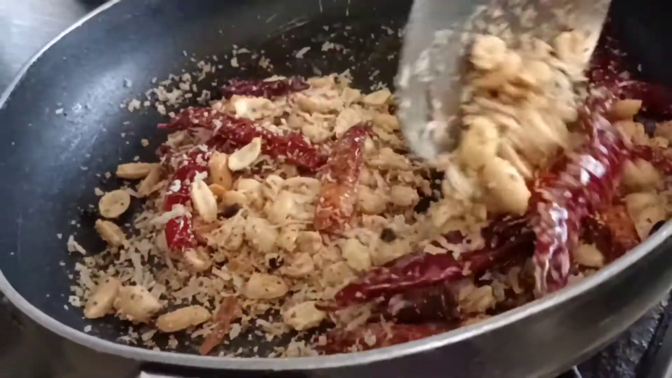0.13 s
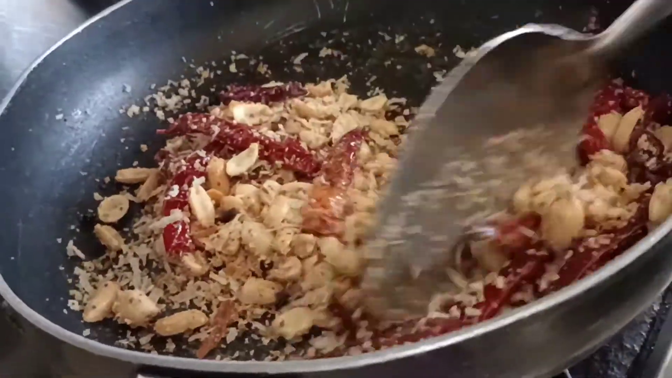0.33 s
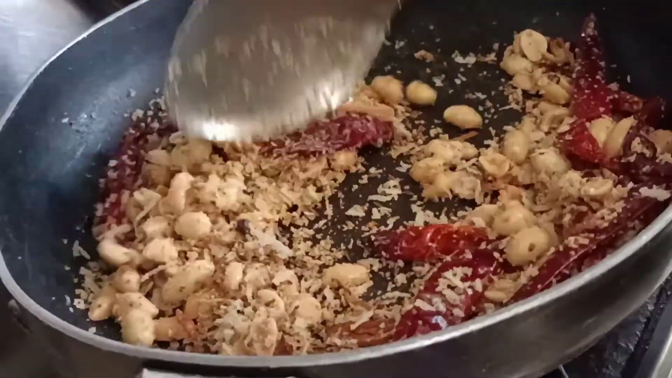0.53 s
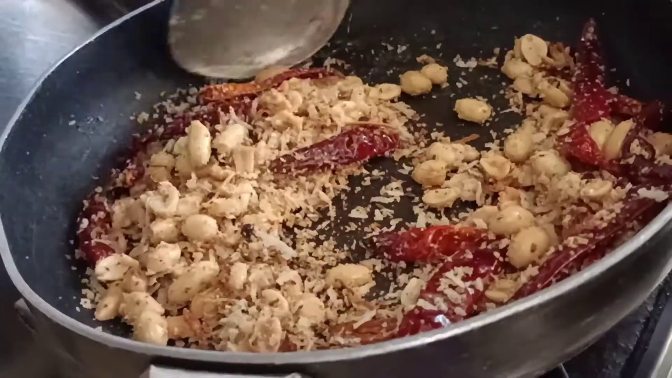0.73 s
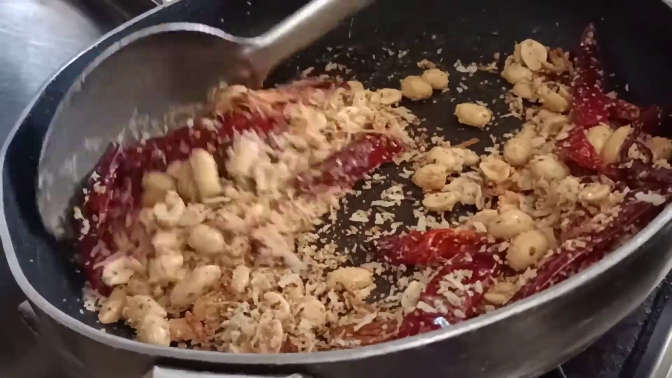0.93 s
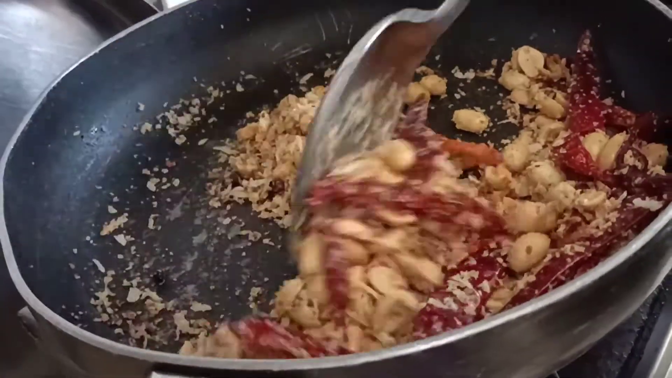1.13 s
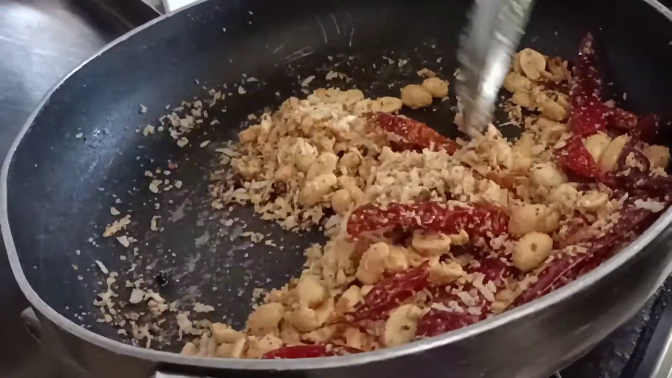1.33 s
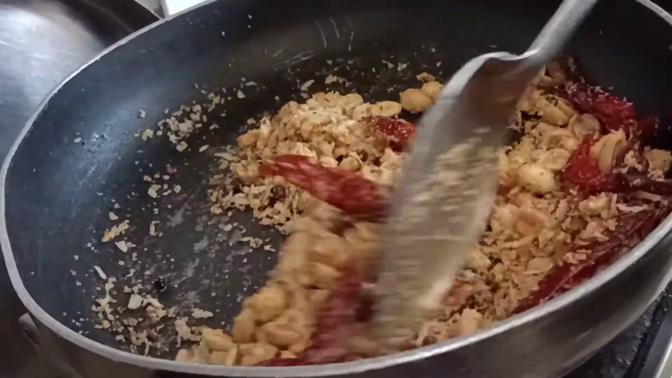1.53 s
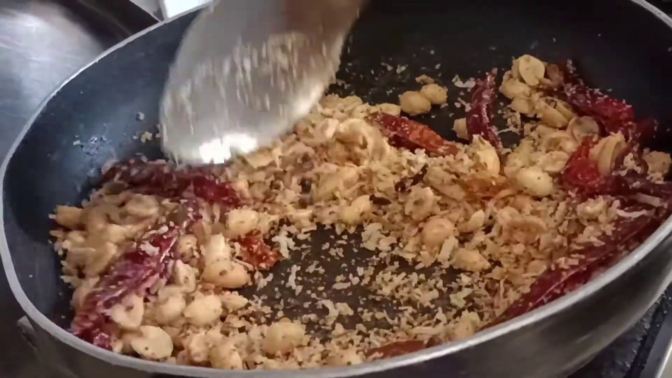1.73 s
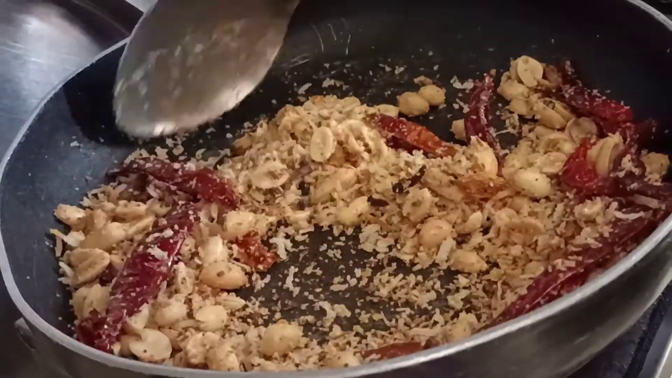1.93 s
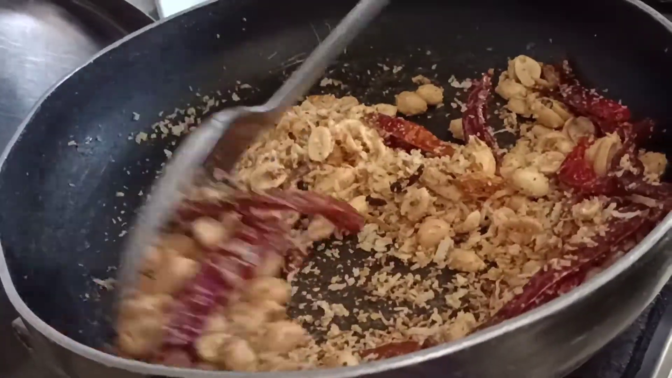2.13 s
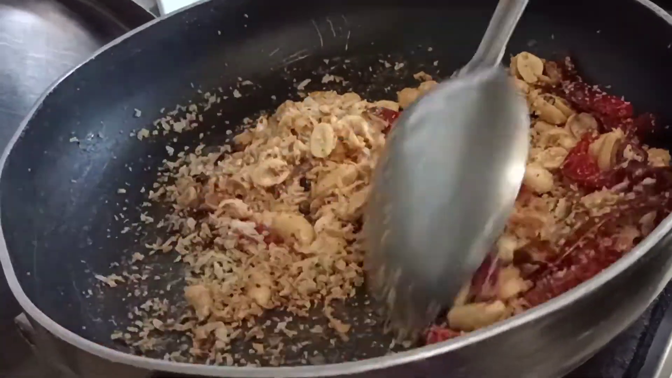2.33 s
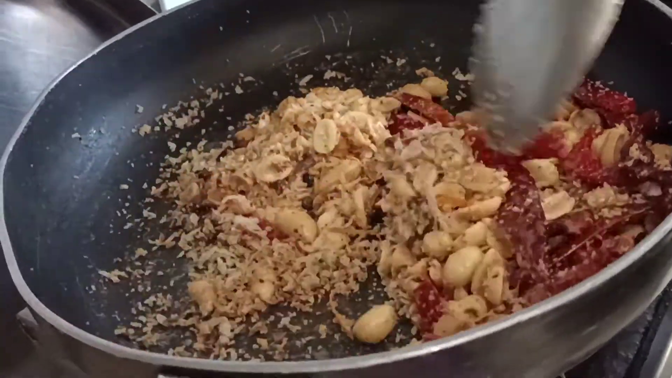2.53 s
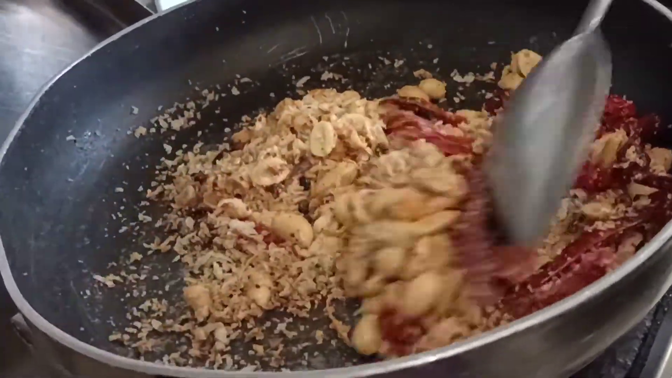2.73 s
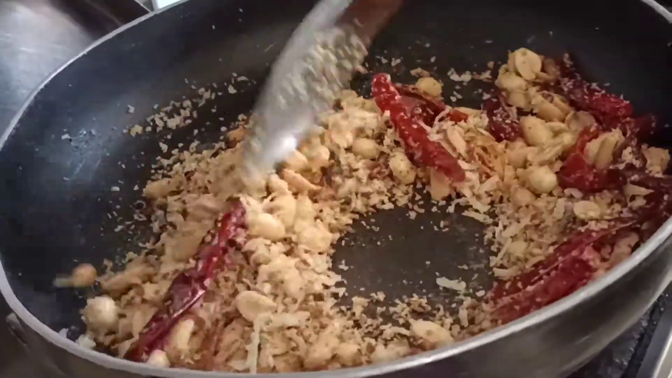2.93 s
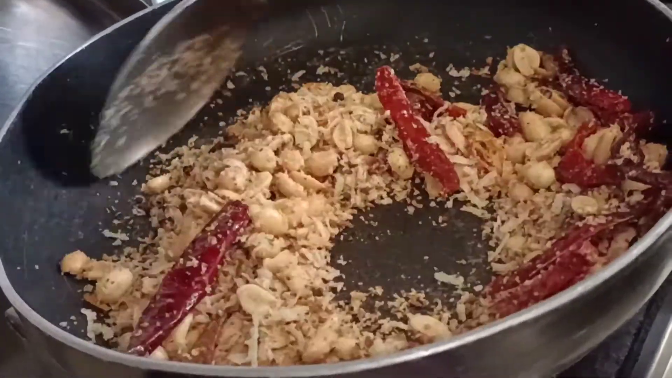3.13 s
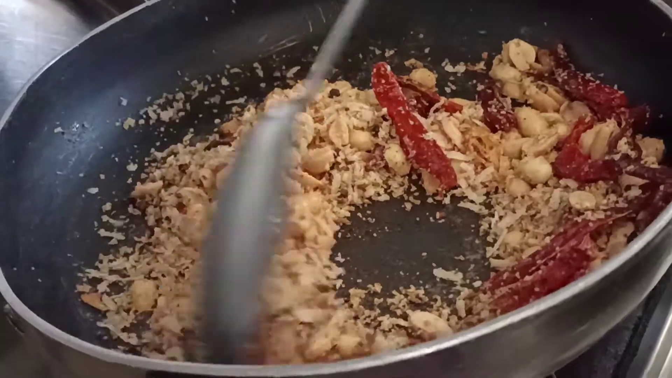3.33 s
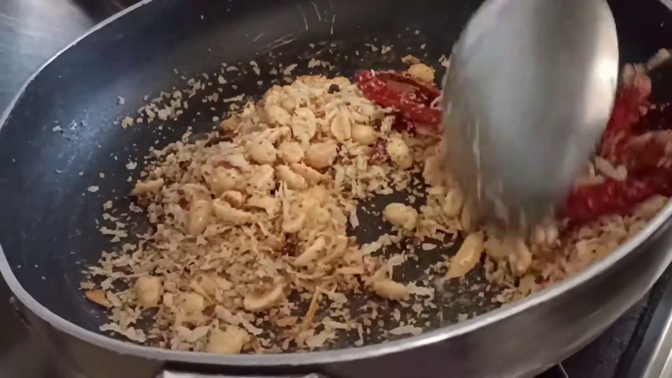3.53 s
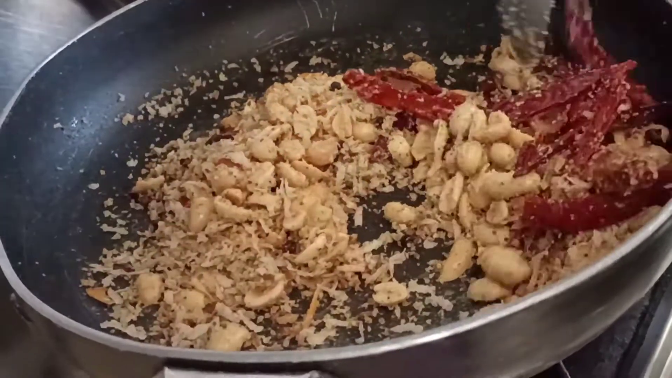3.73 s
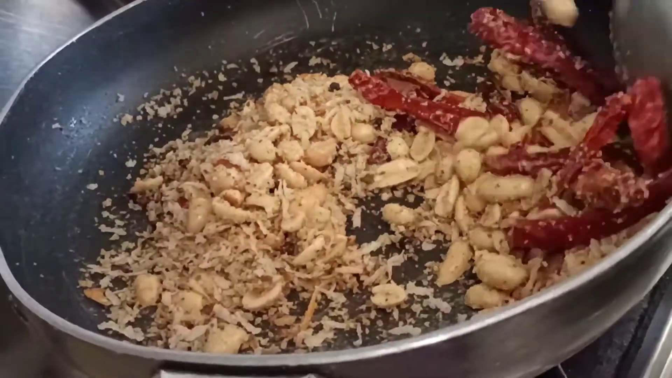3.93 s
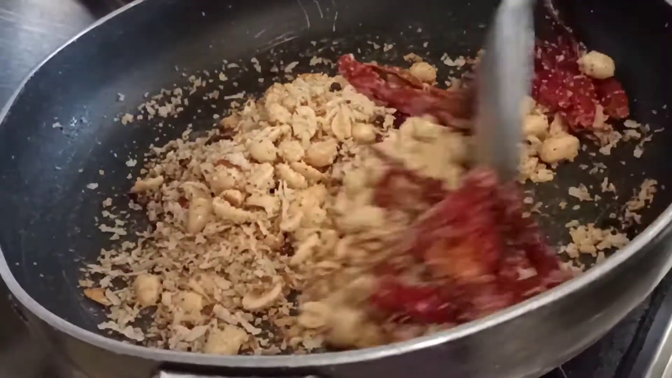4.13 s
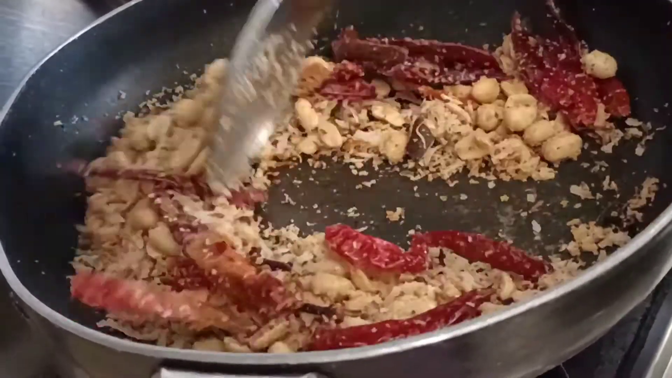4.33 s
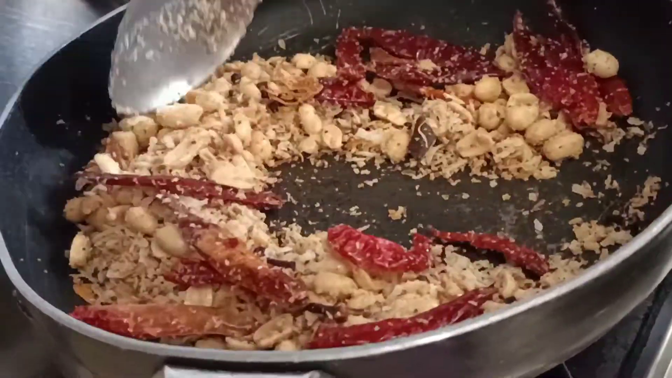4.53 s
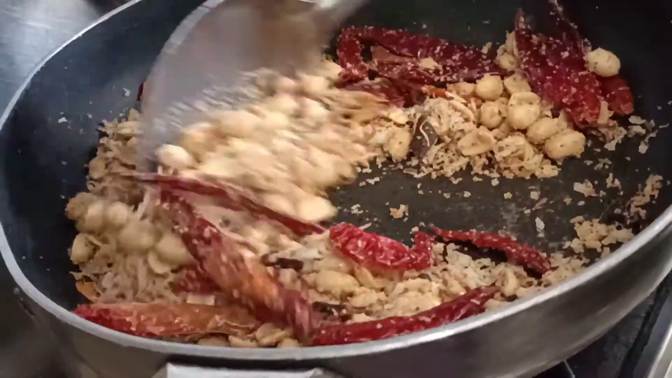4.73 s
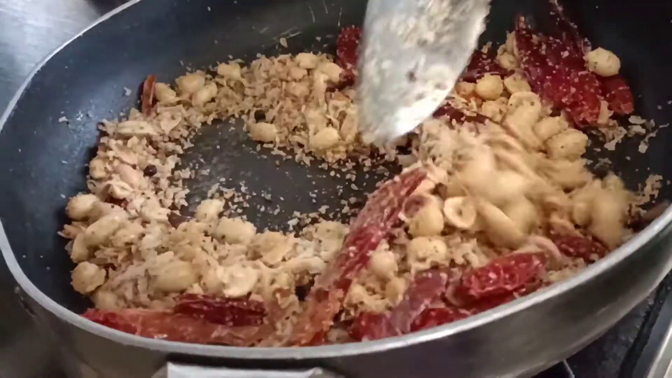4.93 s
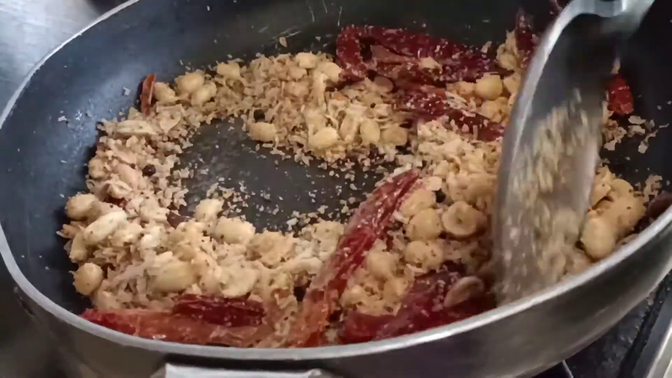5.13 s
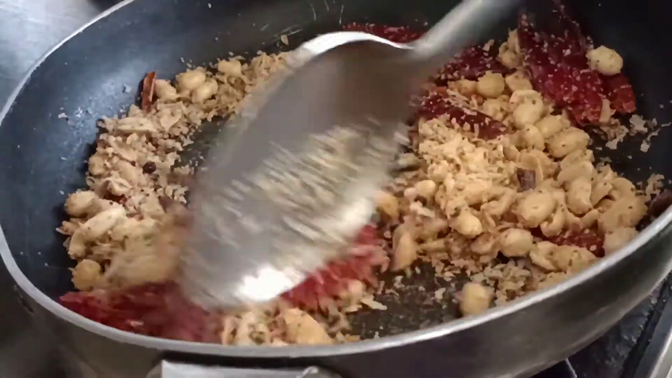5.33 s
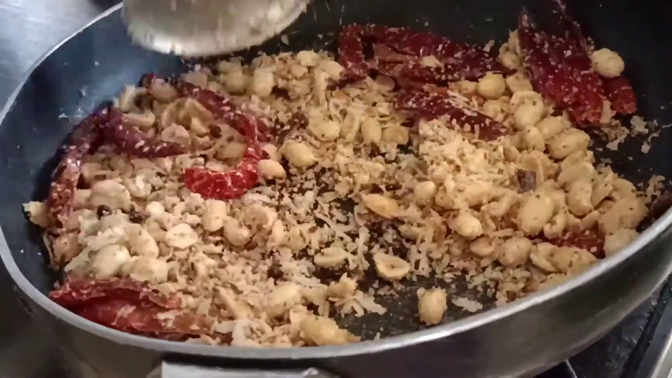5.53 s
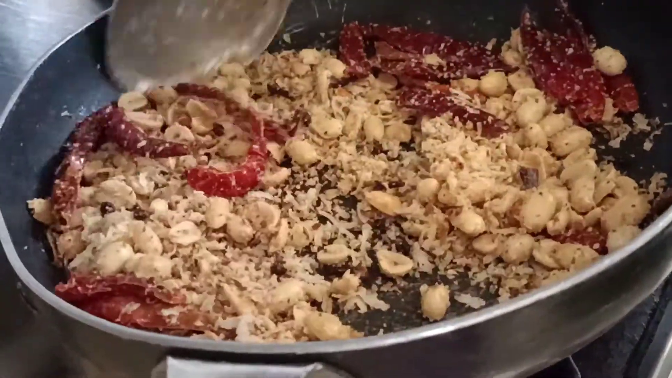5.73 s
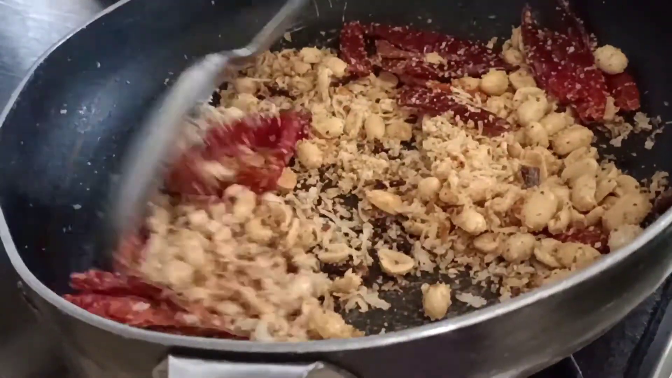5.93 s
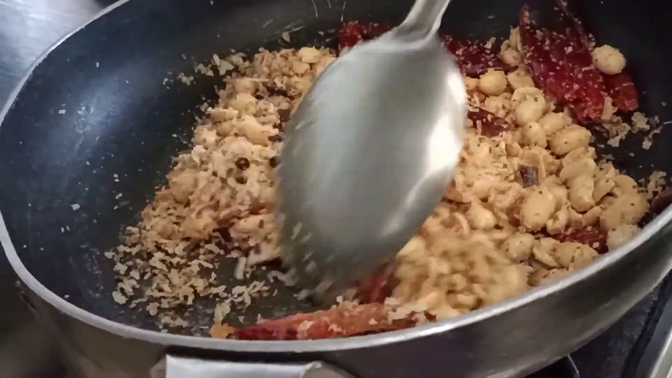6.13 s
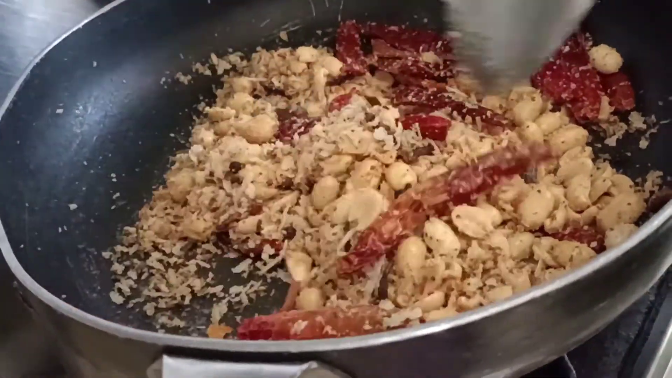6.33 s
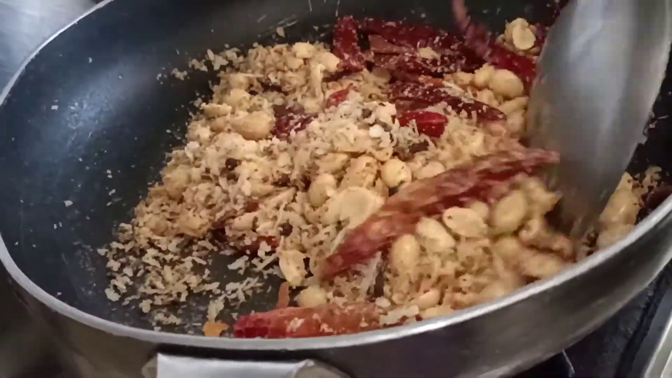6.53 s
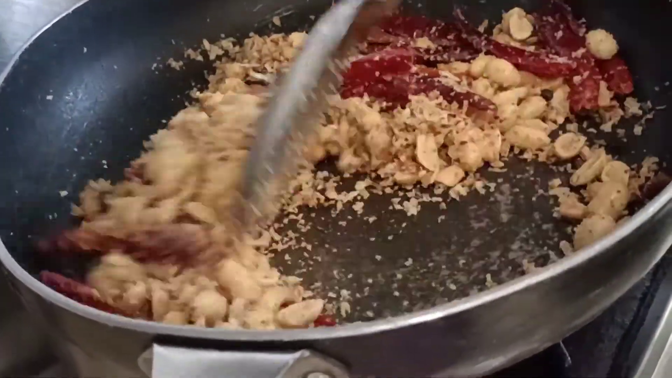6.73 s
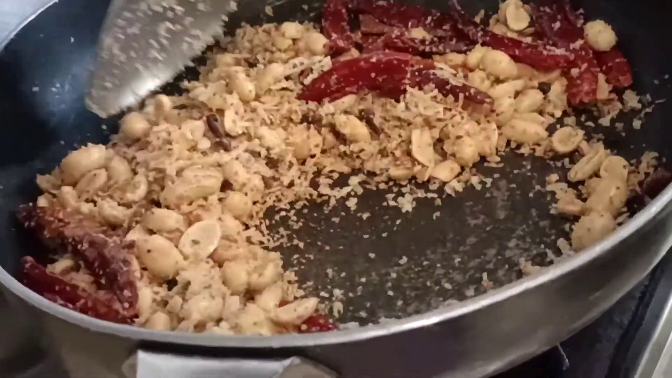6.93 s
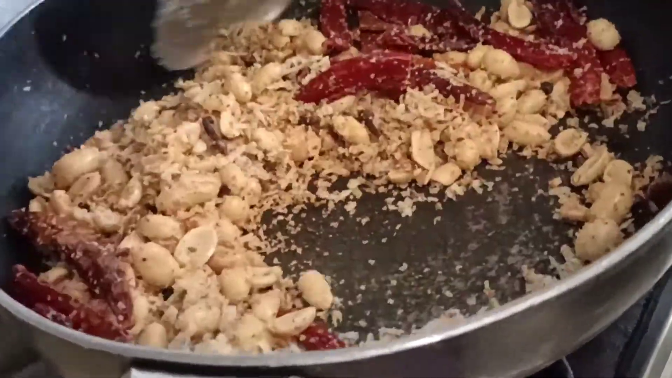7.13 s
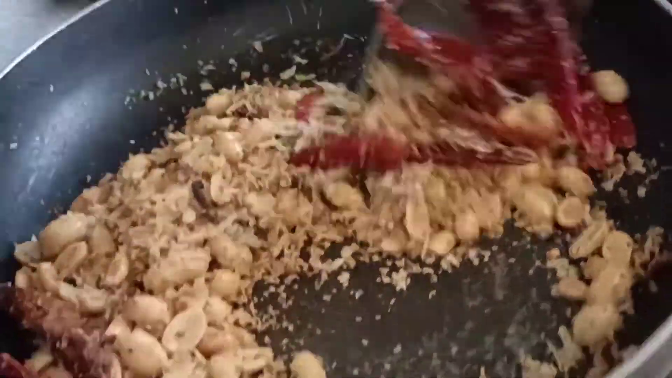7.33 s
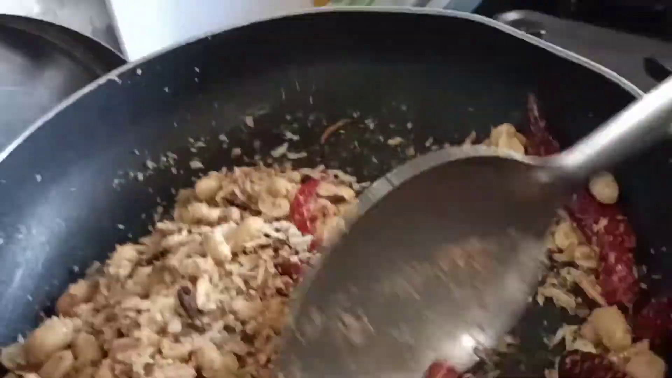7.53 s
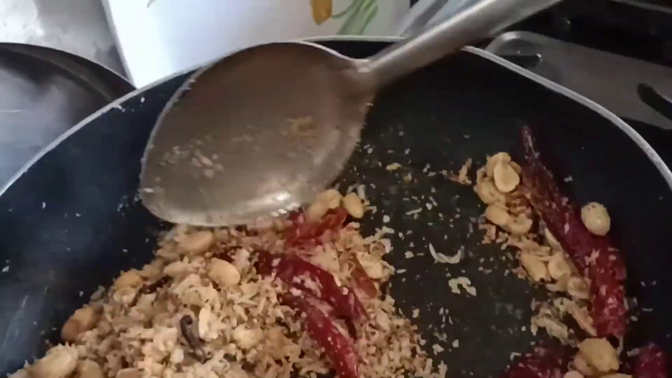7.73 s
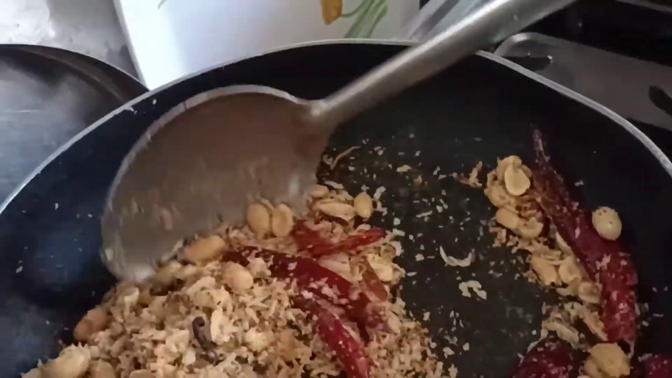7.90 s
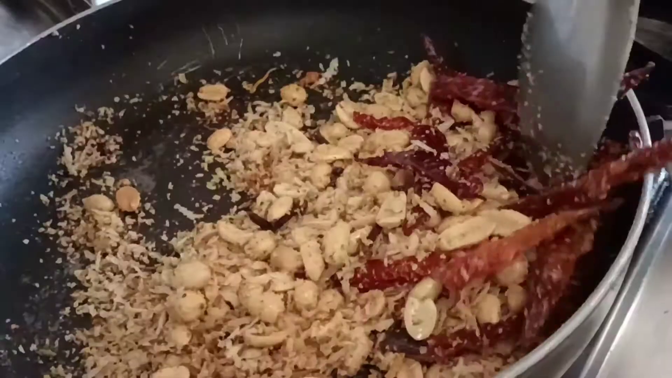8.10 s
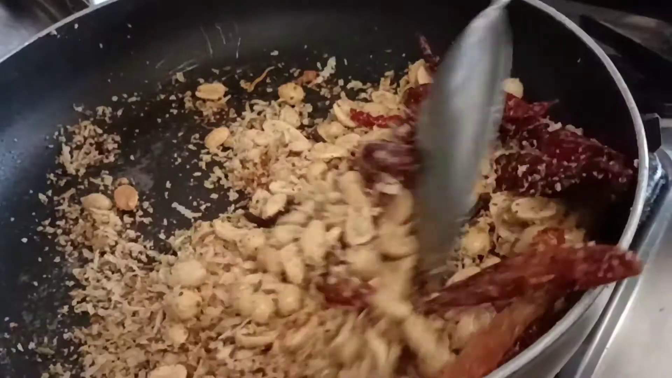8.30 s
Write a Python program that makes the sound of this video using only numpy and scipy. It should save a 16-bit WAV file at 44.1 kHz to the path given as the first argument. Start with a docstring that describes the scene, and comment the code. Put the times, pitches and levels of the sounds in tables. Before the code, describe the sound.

A metal spoon scrapes and clangs around a pan in uneven strokes, pushing dry, rustling coconut flakes, peanuts and brittle chillies, heard close up.

```python
"""In a small kitchen, a steel spoon stirs dry coconut, peanuts and chillies round a nonstick pan, heard close up.
Strokes land with knocks and clangs from struck resonances; the edge scrapes and squeaks as it slips over the coating.
Uneven clicks make the pan judder on its stand and the pushed food rustle; single nuts tick against the wall.
Tapped spoon and touched wall ring on, a soft rumble follows the food, and the room adds a short tail and faint noise."""
import sys
import numpy as np
from scipy import signal
from scipy.fft import rfft, irfft
from scipy.io import wavfile
from scipy.ndimage import map_coordinates

SR = 44100
rng = np.random.default_rng(int(sys.argv[2]) if len(sys.argv) > 2 else 0)


def dump(signal):
    """Clip the signal to [-1, 1] and save it as 16-bit WAV at the path in sys.argv[1]."""
    limited = np.clip(np.atleast_2d(signal).T, -1, 1)
    pcm = np.round(limited * 32767).astype(np.int16)
    wavfile.write(sys.argv[1], SR, pcm)


N = 368889
T = np.arange(N) / SR  # time [s]

# Levels in the tables are relative: most sounds get a make-up gain in their own function.
# the spoon sweeps through the food: (start [s], rise [s], hold [s], fade [s],
# scrape of the edge [dB], rustle of the food [dB], judder of the pan [dB])
SWEEPS = [ (0.0, 0.00054, 0.0069, 0.97, -58, -55.5, -34), (0.089, 0.039, 0.037, 0.12, -25, -38.5, -31),
          (0.205, 0.022, 0.062, 0.13, -24.5, -48, -58), (0.394, 0.029, 0.15, 0.075, -67, -65, -71),
          (0.581, 0.092, 0.027, 0.52, -47.5, -54, -68), (0.738, 0.029, 0.05, 0.23, -37.5, -48.5, -33.5),
          (1.182, 0.085, 0.015, 0.12, -38.5, -44, -46), (1.323, 0.0018, 0.038, 0.29, -30.5, -44, -36),
          (1.848, 0.011, 0.12, 0.15, -52, -54, -52), (1.923, 0.043, 0.18, 0.085, -42.5, -52, -50.5),
          (2.319, 0.057, 0.018, 0.36, -44, -69, -43.5), (2.443, 0.04, 0.12, 0.39, -38.5, -40.5, -39),
          (2.654, 0.033, 0.086, 0.87, -40.5, -59.5, -43.5), (2.997, 0.042, 0.13, .25, -45, -59, -45),
          (3.136, 0.054, 0.0051, 0.15, -34.5, -47, -39), (3.216, 0.068, 0.044, 0.24, -44, -62, -43.5),
          (3.527, 0.0021, 0.019, 0.16, -23.5, -59, -35), (3.623, 0.098, 0.016, 0.23, -31, -35.5, -45),
          (3.758, 0.026, 0.072, 0.34, -36.5, -50, -35.5), (4.128, 0.0044, 0.012, 0.18, -76, -63.5, -66),
          (4.232, 0.063, 0.0059, 0.3, -69, -50.5, -53.5), (4.387, 0.17, 0.021, 0.26, -42.5, -50, -44),
          (4.555, 0.11, 0.065, 0.34, -44, -52.5, -62), (5.1, 0.052, 0.013, 0.16, -24, -40.5, -32),
          (5.233, 0.058, 0.12, 0.031, -51.5, -60, -52.5), (5.531, 0.011, 0.032, 0.16, -50, -52, -67),
          (5.63, 0.056, 0.11, 0.11, -41.5, -52.5, -49), (5.836, 0.034, 0.026, 0.033, -43, -55, -54),
          (6.092, 0.00047, 0.0024, 0.11, -60.5, -49, -41), (6.162, 0.0056, 0.02, 0.092, -58, -46.5, -31),
          (6.186, 0.022, 0.066, 0.2, -42, -37.5, -36), (6.35, 0.035, 0.017, 0.68, -43.5, -56.5, -66),
          (6.855, 0.031, 0.016, 0.93, -40.5, -59, -39.5), (6.992, 0.002, 0.045, 0.17, -22, -41, -36.5),
          (7.483, 0.0062, 0.014, 0.23, -41, -49.5, -30.5), (7.532, 0.099, 0.059, 0.092, -45.5, -52, -34),
          (7.653, 0.027, 0.045, 0.16, -25.5, -34.5, -48), (7.745, 0.002, 0.075, 0.17, -23, -37, -35.5),
          (7.938, 0.039, 0.041, 0.3, -44.5, -56.5, -48), (8.084, 0.0098, 0.054, 0.13, -44, -47.5, -72),
          (8.223, 0.008, 0.019, 0.2, -45, -53, -46.5), (8.305, 0.0025, 0.064, 0.45, -23.5, -60, -26.5), ]
# the spoon leans on the pan and shoves it along its stand: (start [s], hold [s], level [dB])
SHOVES = [(0.004, 0.039, -40), (1.146, 0.094, -28), (2.395, 0.028, -23.5), (3.527, 0.091, -26.5),
          (4.988, 0.021, -41.5), (5.581, 0.075, -42), (6.336, 0.078, -35.5), (6.881, 0.057, -34.5),
          (7.478, 0.04, -24.5), (8.141, 0.25, -42), (8.293, 0.042, -32)]
# the spoon strikes the pan: (time [s], clang [dB], thud [dB], bright crack of the steel edge [dB],
# dull knock through the food [dB])
BLOWS = [(0.094, -27, -25, -44, -35), (0.121, -26, -27, -26, -43), (0.139, -18, -24, -34, -43),
         (0.173, -6, -21, -36.5, -45), (0.335, -16, -57, -40, -37), (1.1487, -20, -26, -63, -34.5),
         (1.321, -16, -23, -54, -51.5), (1.369, -15, -28, -50, -30.5), (2.3935, -18, -10.5, -60, -22.5),
         (2.4003, -32, -32, -60, -20), (2.413, -35, -32, -60, -20), (3.1747, -15, -32, -42, -41),
         (3.5241, 0, -21, -35, -18), (3.545, -23, -33, -44, -21), (3.8948, -16, -43, -45, -41),
         (5.1063, -23, -20.5, -35, -25.5), (5.126, -8, -11.5, -36, -35), (5.143, -11, -34, -45.5, -24),
         (5.156, -11.5, -28, -35, -36), (6.1667, -42, -28, -54, -41), (6.219, -36, -31.5, -52, -27.5),
         (6.8753, -18, -44, -35.5, -51), (6.89, -28.5, -37, -61, -33), (6.9945, -1.5, -34, -19, -30),
         (7.01, -5.5, -44, -28, -38), (7.097, -14.5, -51.5, -55, -42), (7.479, -20, -24, -58, -27.5),
         (7.6503, -15, -18.5, -50, -24), (7.6867, -18, -50, -43, -34), (7.7399, -0.5, -32, -35, -36),
         (7.768, -6, -38, -45, -32), (8.3064, -3, -18, -42, -22)]
# the bowl of the spoon is pressed through the heap: (middle [s], length [s], level [dB])
GRINDS = [(0.259, 0.23, -40), (2.554, 0.13, -27), (2.64, 0.15, -37), (3.731, 0.18, -28), (3.82, 0.11, -32),
          (4.681, 0.15, -48.5), (6.306, 0.26, -37)]
# the edge sticks and squeaks: (start [s], length [s], start pitch [Hz], end pitch [Hz], level [dB])
SQUEAKS = [(0.148, 0.039, 2865, 2837, -21.5), (0.208, 0.053, 1933, 1920, -28.5),
           (0.212, 0.097, 680, 686, -34), (0.27, 0.075, 3280, 3300, -42), (1.32, 0.01, 2880, 2830, -24.5),
           (1.323, 0.057, 2490, 2470, -34.5), (2.49, 0.038, 2760, 2844, -39),
           (2.572, 0.038, 1950, 1916, -32), (2.64, 0.018, 2190, 3320, -31), (6.166, 0.017, 2850, 2890, -42),
           (6.198, 0.021, 2680, 2354, -27.5), (6.25, 0.057, 2820, 2780, -38),
           (6.85, 0.017, 2530, 2620, -38.5), (7.678, 0.039, 1912, 1680, -20.5),
           (7.7377, 0.008, 4100, 4100, -13.5), (7.797, 0.037, 4080, 4020, -38),
           (8.099, 0.029, 2516, 2490, -38.5)]
# nuts and chillies hit the wall: (time [s], peak level [dB], pitch [Hz])
TICKS = [(0.4541, -37, 2200), (0.6728, -25.5, 2470), (1.4586, -23.5, 2650), (1.5448, -32, 2870),
         (1.589, -27.5, 2160), (2.145, -36, 2360), (2.9183, -38, 2550), (3.8932, -21.5, 2040),
         (4.2424, -32.5, 2400), (5.345, -27, 2240), (5.3926, -37.5, 2770), (5.5347, -36.5, 3610),
         (5.543, -28, 2390), (5.6496, -28.5, 2260), (5.8523, -34.5, 2000), (6.094, -46.5, 4140),
         (6.96, -28.5, 1650), (7.986, -28, 2790), (8.077, -28, 2270), (8.1, -26.5, 2430),
         (8.2428, -31, 3020)]
# a touch leaves one mode of the pan wall singing until the spoon damps it:
# (start [s], damped from [s], pitch [Hz], level [dB], t60 [s])
WALL_RINGS = [(2.396, 2.392, 715, -16.5, .14), (3.183, 3.19, 693, -23.5, 0.22),
              (3.523, 3.56, 1924, -20, .2), (3.525, 3.55, 3290, -18, .16), (5.194, 5.236, 682, -23.5, 0.23),
              (5.655, 5.788, 664, -40.5, 1.9), (5.650, 5.75, 1123, -44.5, .55),
              (6.1, 6.183, 1130, -47, 1.2), (7.48, 7.54, 691, -19, 0.14), (7.788, 7.785, 684, -24, 0.44),
              (8.304, 8.36, 1380, -18, 0.17), (8.305, 8.36, 1870, -12, 0.18), (8.3, 8.36, 1940, -21, 0.27)]
# the lifted spoon is tapped and rings by itself: (time [s], level [dB])
SPOON_TAPS = [(4.959, -46), (4.991, -36.5), (8.098, -39)]

# resonances of the pan with the spoon in it: (pitch [Hz], width [Hz], level [dB])
PAN_MODES = [(192, 18, -6), (311, 15, -3), (668, 16, 2), (722, 20, -1), (817, 20, -4), (1030, 30, -3),
             (1125, 24, -4), (1197, 16, 1), (1275, 30, 1), (1390, 26, 1), (1686, 20, -4), (1820, 30, -4),
             (1879, 18, 3), (1945, 38, 2), (2024, 28, 0), (2300, 50, -9), (2481, 30, -1), (2720, 40, -6),
             (2839, 26, 0), (2895, 40, 0), (3285, 34, 2), (3985, 50, -2), (4070, 70, -5), (4300, 60, -12),
             (4720, 50, -13), (5190, 50, -9), (5720, 45, -16)]
# resonances of the pan floor padded by food: (pitch [Hz], width [Hz], level [dB])
KNOCK_MODES = [(195, 50, -3), (440, 70, -3), (570, 70, -4), (690, 48, 1.5), (800, 70, -1), (950, 80, -4),
               (1100, 80, -2), (1340, 70, -4), (1950, 110, -14), (2900, 170, -10)]
# resonances of the pan rocking on its stand: (pitch [Hz], width [Hz], level [dB])
STAND_MODES = [(92, 25, -15), (165, 25, -6), (191, 20, 2), (255, 30, -4.5), (312, 16, 4.5), (392, 16, -3),
               (505, 50, -11), (675, 60, -7)]
# resonances of the bowl of the spoon: (pitch [Hz], width [Hz], level [dB])
SPOON_MODES = [(2470, 40, -6), (2896, 90, -21), (3400, 60, -15), (4404, 45, -9), (5303, 50, -15),
               (8624, 90, -19), (9539, 100, -19), (10430, 100, -14), (11500, 110, -17), (13400, 160, -20)]
# resonances of the hollow under the bowl: (pitch [Hz], width [Hz], level [dB])
HOLLOW_MODES = [(659, 95, 0), (1060, 72, -4), (1140, 48, 0), (1230, 40, -7), (1970, 70, -11),
                (2490, 70, -14), (2820, 70, -14), (3520, 80, -14), (4750, 120, -18)]

# tone of the pan's crowded weak resonances: (frequency [Hz], gain [dB])
METAL_TONE = [(150, -24), (300, -4), (540, -11), (700, 2), (900, 0), (1250, 4.5), (1550, -1.5), (2000, 4.5),
              (3000, 0.5), (4200, -6.5), (5500, -23.5), (7000, -46.5), (10500, -16), (15000, -58.5)]
# tone of the rustling food: (frequency [Hz], gain [dB])
FOOD_TONE = [(100, -16), (200, -11), (800, -9), (1300, -4.5), (2600, -.5), (4300, -4.5), (5400, -8.5),
             (6500, -18), (9700, -16.5), (12000, -20), (15000, -25)]
# tone of the steady room noise: (frequency [Hz], gain [dB])
KITCHEN_TONE = [(25, -2.5), (59, -21), (191, 0), (604, 1.5), (1280, -9), (2850, -6.5), (6720, -27),
                (11500, -23), (15000, -18)]
# tone of the heap's dull patter: (frequency [Hz], gain [dB])
PATTER_TONE = [(60, -24), (125, -9), (175, 3), (260, 1), (500, -5), (900, -11), (2000, -30), (6000, -60)]
# tone of the crack of the steel edge: (frequency [Hz], gain [dB])
CRACK_TONE = [(1000, -36.0), (3500, -10.0), (5200, 12.0), (6500, -13.5), (10000, -13.5),
              (12000, -35.5), (15000, -40)]
# tone of the deep rumble: (frequency [Hz], gain [dB])
RUMBLE_TONE = [(45, -24), (70, -12), (88, 2), (120, -4), (190, -5), (330, -18), (1000, -52)]
# right microphone over the left: (frequency [Hz], gain [dB])
MICROPHONE_TILT = [(100, .5), (700, 1), (1300, -1.5), (2400, -1.5), (4500, -1), (6200, 0), (7300, 13),
                   (9700, 15), (12000, 5), (15000, 1)]
# flakes, pods and nuts crackle in ranges of their own: range edges [Hz]
GRAIN_RANGES = [90, 900, 1500, 2100, 2700, 3400, 4300, 6000, 9500, 16000]

SWEEP_RISE_DB, SWEEP_SAG_DB_PER_S = 11, 15.5  # swell as the spoon bites; slow loss as it runs on
FADE_DB = 30  # fall over the fade time of a push
FOOD_SETTLE = 0.86  # fade time of the food and pan over that of the edge
SHOVE_RISE_S, SHOVE_SAG_DB_PER_S, SHOVE_FADE_S = 0.0019, 72.5, 0.21
TRICKLE_DB, TRICKLE_DB_PER_S = -34, 52  # loose crumbs keep sliding after a push
KITCHEN_DB = -68
TOP_HZ = 15100  # upper limit of the microphones


def undb(db):
    """Decibels to gain."""
    return np.exp(np.asarray(db) * np.log(10) / 20)


def convolve(x, response):
    """Pass a sound through a response, keeping its length."""
    full = signal.oaconvolve(np.atleast_2d(x), np.atleast_2d(response), axes=-1)
    return full[:, :np.shape(x)[-1]]


def colour(x, points):
    """Minimum-phase equaliser through the given (Hz, dB) points, so no sound precedes its cause."""
    hz, db = np.transpose(points)
    size = 2048
    bins_hz = np.arange(size // 2 + 1) * SR / size
    gain_db = np.interp(np.log(bins_hz + 1), np.log(hz), db)
    # folding the cepstrum forward makes the response causal
    cepstrum = irfft(np.log(undb(gain_db)))
    cepstrum[1:size // 2] *= 2
    cepstrum[size // 2 + 1:] = 0
    return convolve(x, irfft(np.exp(rfft(cepstrum))))


def add(out, s, x):
    """Mix a short sound in at a given time."""
    start = int(np.clip(s * SR, 0, N - 1))
    out[..., start:start + x.shape[-1]] += x[..., :N - start]


def strikes(times, gains):
    """One impulse for each event."""
    x = np.zeros(N)
    samples = (np.asarray(times) * SR).astype(int)
    np.add.at(x, np.clip(samples, 0, N - 1), gains)
    return x


def walk(rate):
    """Random drift with a spread near 1, gliding between fresh values at the given rate per second."""
    knots = rng.standard_normal(2048)
    return 1.28 * np.interp(T * rate, np.arange(len(knots)), knots)


def clicks(rate, spread_db):
    """Random tiny impacts of uneven size, about `rate` per second, rms 1."""
    size = undb(spread_db * np.minimum(rng.exponential(size=N), 4))
    hits = rng.random(N) < rate / SR
    x = hits * size * rng.choice([-1, 1], N)
    return x / x.std()


def tail(t60, shared_hz):
    """Decaying noise of unit energy for two microphones, alike in the bass."""
    t = T[:SR // 2]
    mid, side = rng.standard_normal((2, len(t)))
    high_pass = signal.butter(1, shared_hz, "high", fs=SR, output="sos")
    side = signal.sosfilt(high_pass, side)
    x = np.array([mid + side, mid - side]) * undb(-60 * t / t60)
    return x / np.sqrt((x ** 2).sum() / 2)


def ports(x):
    """Direct sound reaches the left microphone a quarter of a millisecond late."""
    lag = 10  # samples
    left, right = np.broadcast_to(x, (2, N))
    return np.array([np.pad(left, (lag, 0))[:N], right])


def ring(force, modes, wander_db):
    """Resonances whose strengths wander as the contact moves; high ones reach the microphones out of step."""
    out = np.zeros((2, N))
    for k, (hz, width, db) in enumerate(modes):
        pole = np.exp((2j * np.pi * hz - np.pi * width) / SR)
        # neighbouring modes alternate in polarity; the tiny offset keeps the filter from stalling
        mode = (-1) ** k * signal.lfilter([2 * (1 - abs(pole))], [1, -pole], force + 1e-18)
        skew = np.exp(1j * rng.uniform(-0.85, 1) * min(hz / 2600, 1))
        pair = np.array([(mode * skew).real, (mode / skew).real])
        out += pair * undb(db + wander_db * walk(12))
    return ports(out)


def thicket(force, t60):
    """Crowded, well-damped resonances; other ones take over as the contact travels."""
    share = np.exp(1.5 * np.array([walk(9) for _ in range(3)]))
    share /= np.sqrt((share ** 2).sum(axis=0))
    return sum(convolve(force * part, tail(t60, shared_hz=700)[:, :SR // 10]) for part in share)


def bend(x, drift_s):
    """Changing pressure pulls the pitch of the resonances up and down a little."""
    place = (T + drift_s * walk(14)) * SR
    return np.array([map_coordinates(side, [place], order=3) for side in x])


def push(rise_s, hold_s, fade_s, sag_db_per_s):
    """One push of the hand: it swells, holds while slowly easing, then dies away into a faint trickle."""
    age = T[:SR]
    swell_db = SWEEP_RISE_DB * np.clip(1 - age / rise_s, 0, 1) ** 1.2
    sag_db = sag_db_per_s * np.clip(age - rise_s, 0, hold_s)
    released = np.maximum(age - rise_s - hold_s, 0)
    trickle_fall_db = TRICKLE_DB_PER_S * released - TRICKLE_DB
    fade_db = np.minimum(FADE_DB * released / fade_s, trickle_fall_db)
    return undb(-swell_db - sag_db - fade_db)


def stroke_gains():
    """Judder, scrape and rustle: every sweep drives all three, a shove only shakes the pan."""
    judder_power, scrape_power, rustle_power = np.zeros((3, N))
    for s, rise_s, hold_s, fade_s, scrape_db, rustle_db, judder_db in SWEEPS:
        edge = push(rise_s, hold_s, fade_s, SWEEP_SAG_DB_PER_S)
        food = push(rise_s, hold_s, fade_s * FOOD_SETTLE, SWEEP_SAG_DB_PER_S)
        add(scrape_power, s, (undb(scrape_db) * edge) ** 2)
        add(rustle_power, s, (undb(rustle_db) * food) ** 2)
        add(judder_power, s, (undb(judder_db) * food) ** 2)
    for s, hold_s, db in SHOVES:
        shove = push(SHOVE_RISE_S, hold_s, SHOVE_FADE_S, SHOVE_SAG_DB_PER_S)
        add(judder_power, s, (undb(db) * shove) ** 2)
    return np.sqrt([judder_power, scrape_power, rustle_power])


def firmness(gain, half_db):
    """Share of steel-on-pan contact: light strokes ride on the food, hard ones reach the metal."""
    return gain / (gain + undb(half_db))


def pan(force, firm, dense_db, dense_t60):
    """A few strong wall modes, roused by firm contact, over a thicket of weak, well-damped ones."""
    dense = colour(thicket(force, dense_t60), METAL_TONE)
    return ring(force * firm, PAN_MODES, wander_db=3.5) + undb(dense_db) * dense


def scrape(gain):
    """The edge catches and slips on grit and coating, in uneven spurts."""
    slips = clicks(rate=600, spread_db=2.2) * undb(1.5 * walk(55))
    metal = pan(slips * gain, firmness(gain, half_db=-42), dense_db=-13.5, dense_t60=.06)
    return undb(16.5) * bend(metal, drift_s=0.00021)


def judder(gain):
    """The heap tumbles with a dull patter; a firm drag shakes the pan on its stand."""
    bumps = clicks(rate=600, spread_db=2.2) * gain
    patter = colour(convolve(bumps, tail(t60=.04, shared_hz=700)), PATTER_TONE)
    shake = ring(bumps * firmness(gain, half_db=-43), STAND_MODES, wander_db=2)
    return undb(20) * (shake + undb(-11) * patter)


def rustle(gain):
    """Dry flakes and pods rub and crack, each size in its own spurts, and patter on the spoon's bowl."""
    grains = undb(-8) * clicks(rate=1500, spread_db=4)
    for edges in zip(GRAIN_RANGES, GRAIN_RANGES[1:]):
        spurts = clicks(rate=300, spread_db=3.6) * undb(3.5 * walk(40))
        band = signal.butter(2, edges, "band", fs=SR, output="sos")
        grains += undb(-2.5) * signal.sosfilt(band, spurts)
    force = grains * gain
    food = colour(undb(-8) * ports(force) + thicket(force, t60=.035), FOOD_TONE)
    bowl = undb(2) * ring(force, SPOON_MODES, wander_db=4)
    return undb(15.5) * (food + bowl)


def low_rumble(gain):
    """A soft, deep rumble swells whenever the food is moved."""
    x = colour(ports(rng.standard_normal(N)), RUMBLE_TONE)
    return undb(-29) * x / x.std() * gain ** 0.55  # the power evens out loud and soft strokes


def kitchen():
    """Faint steady room noise, partly shared by the two microphones."""
    shared = ports(rng.standard_normal(N))
    x = colour(shared + .5 * rng.standard_normal((2, N)), KITCHEN_TONE)
    return undb(KITCHEN_DB) * x / x.std()


def nut_clicks(events, t60):
    """A hard nut gives a short woody click, a little different at each microphone."""
    out, t = np.zeros((2, N)), T[:SR // 25]
    soften = signal.butter(3, [900, 4200], "band", fs=SR, output="sos")
    for s, db, hz in events:
        noise = rng.standard_normal((3, len(t))) * undb(-60 * t / t60)
        crack = signal.lfilter(*signal.iirpeak(hz, 2.2, fs=SR), noise[0] + 0.11 * noise[1:])
        crack = signal.sosfilt(soften, crack)
        add(out, s, undb(db) * crack / abs(crack.mean(axis=0)).max())
    return out


def ticks(rustle_gain):
    """Single nuts hit the wall; many smaller clicks at random times follow the loudness of the moving heap."""
    chance = rng.random((600, 3))
    s = chance[:, 0] * T[-1]
    heap_db = 20 * np.log10(np.interp(s, T, rustle_gain) + 1e-9)
    db = heap_db + 10 + 11 * chance[:, 1] ** 3  # a few stand out
    hz = 1500 * 3 ** chance[:, 2]
    return nut_clicks(TICKS, t60=.03) + nut_clicks(zip(s, db, hz), t60=.014)


def blows():
    """The spoon lands: the wall clangs and chatters, the padded floor knocks, the stand thuds, the edge cracks."""
    s, clang_db, thud_db, edge_db, knock_db = np.transpose(BLOWS)
    bounces = clicks(rate=1500, spread_db=2)[:SR // 4]
    chatter = undb(-31) * bounces * np.exp(-T[:SR // 4] / .014)
    chatter[0] = 1  # the landing itself
    landings = convolve(strikes(s, undb(clang_db)), chatter)[0]
    clang = pan(landings, firm=1, dense_db=-9.5, dense_t60=.08)
    thud = ring(strikes(s, undb(thud_db)), STAND_MODES, wander_db=1.5)
    knock = ring(strikes(s, undb(knock_db)), KNOCK_MODES, wander_db=2)
    knock = signal.sosfilt(signal.butter(2, 150, "high", fs=SR, output="sos"), knock)
    edge = convolve(strikes(s, undb(edge_db)), tail(t60=0.17, shared_hz=900))
    edge = colour(edge, CRACK_TONE)
    return undb(26.5) * clang + undb(42) * knock + undb(35.0) * thud + undb(23.0) * edge


def grind():
    """Food crushed under the bowl buzzes in the hollow between spoon and pan."""
    gain = np.zeros(N)
    for s, length, db in GRINDS:
        gain += undb(db) * np.cos(np.pi * np.clip((T - s) / length, -.5, .5)) ** 2
    buzz = ring(clicks(rate=1600, spread_db=0.5) * gain, HOLLOW_MODES, wander_db=2.5)
    return undb(23.5) * bend(buzz, drift_s=.0005)


def squeaks():
    """For a moment the slips lock into a rough, gliding tone."""
    out = np.zeros(N)
    for s, length, start_hz, end_hz, db in SQUEAKS:
        u = np.linspace(0, 1, int(length * SR))
        glide_hz = start_hz + (end_hz - start_hz) * u
        hz = glide_hz * (1 + .018 * walk(700)[:len(u)])  # rough pitch
        swell = np.sqrt(np.sin(np.pi * u).clip(0))
        add(out, s, undb(db) * swell * np.sin(2 * np.pi * np.cumsum(hz) / SR))
    return out + undb(0.5) * convolve(out, tail(t60=0.1, shared_hz=900))


def free_rings():
    """The touched pan wall sings until the spoon damps it; out of the food, the tapped spoon rattles and rings."""
    wall, age = np.zeros(N), T[:SR // 2]
    for s, damped_s, hz, db, t60 in WALL_RINGS:
        since_damped = np.maximum(s + age - damped_s, 0)
        damping = np.maximum(np.exp(-since_damped / 0.026), .05)  # a trace rings on
        brushed_db = 2.5 * walk(70)[:len(age)]  # level flutter
        level = undb(db + brushed_db - 60 * age / t60)
        add(wall, s, np.sin(2 * np.pi * hz * age) * level * damping)
    s, db = np.transpose(SPOON_TAPS)
    rattle = undb(-18) * clicks(rate=900, spread_db=2)[:SR // 8] * np.exp(-T[:SR // 8] / .012)
    rattle[0] = 1  # the tap itself
    taps = convolve(strikes(s, undb(db)), rattle)[0]
    spoon = undb(46) * ring(taps, SPOON_MODES, wander_db=3)
    return spoon + ports(wall)


def scene():
    """All sounds of the pan, with the tail of the kitchen walls."""
    judder_gain, scrape_gain, rustle_gain = stroke_gains()
    spoon = scrape(scrape_gain) + judder(judder_gain) + blows() + grind() + squeaks() + free_rings()
    near = spoon + rustle(rustle_gain) + ticks(rustle_gain)
    walls = convolve(near, tail(t60=0.3, shared_hz=427))
    return near + undb(-4.5) * walls + low_rumble(rustle_gain) + kitchen()


def record(dry):
    """The two microphones differ in tone; the highest peaks are rounded and the top is cut."""
    hz, db = np.transpose(MICROPHONE_TILT)
    # each side takes half of the difference
    heard = np.vstack([colour(x, np.c_[hz, side * db / 2]) for x, side in zip(dry, (-1, 1))])
    rounded = heard / (1 + heard ** 4) ** .25
    low_pass = signal.ellip(8, .2, 70, TOP_HZ, fs=SR, output="sos")
    return signal.sosfilt(low_pass, rounded)


dry = scene()
out = record(dry)
dump(out)
```